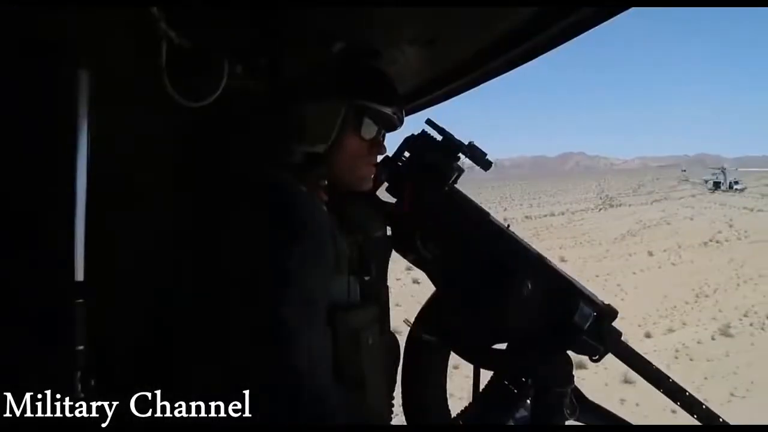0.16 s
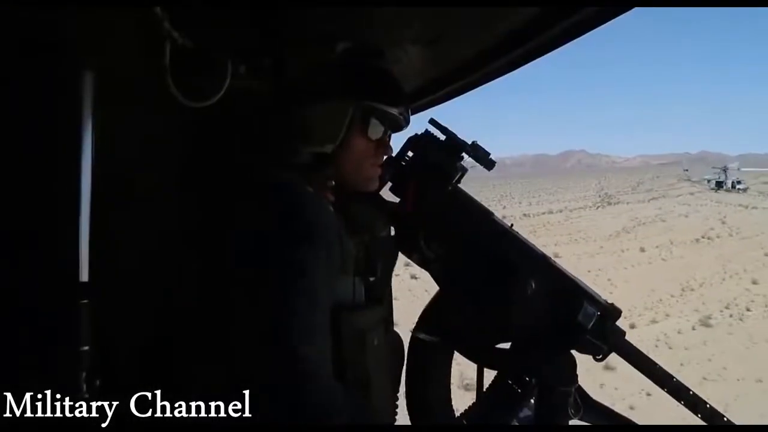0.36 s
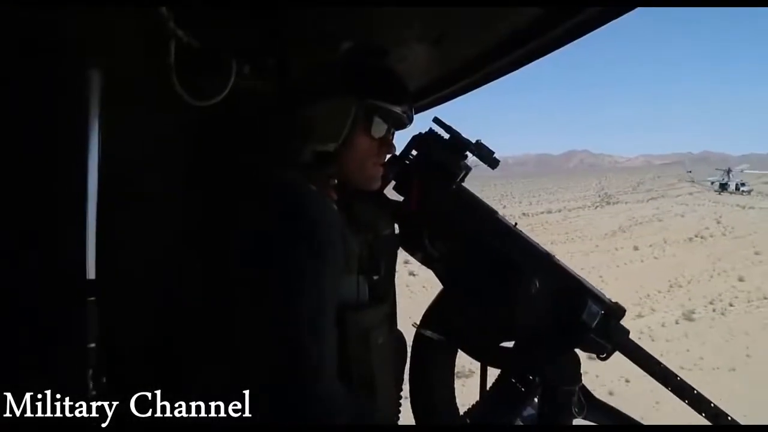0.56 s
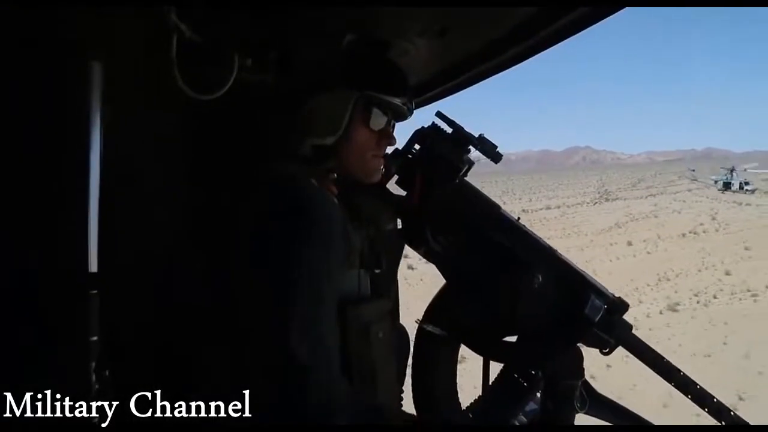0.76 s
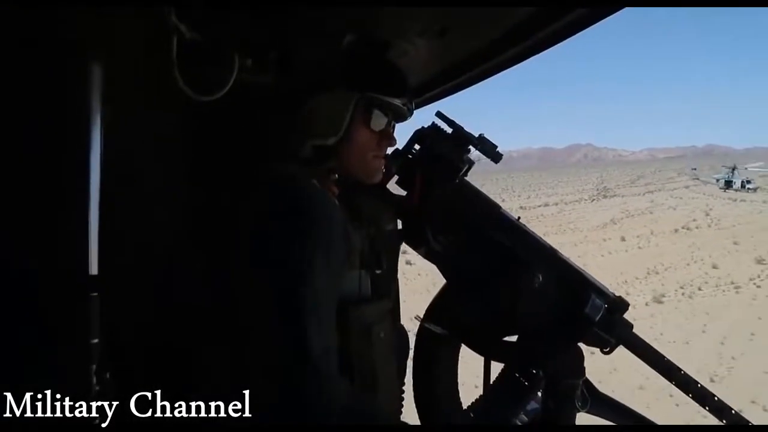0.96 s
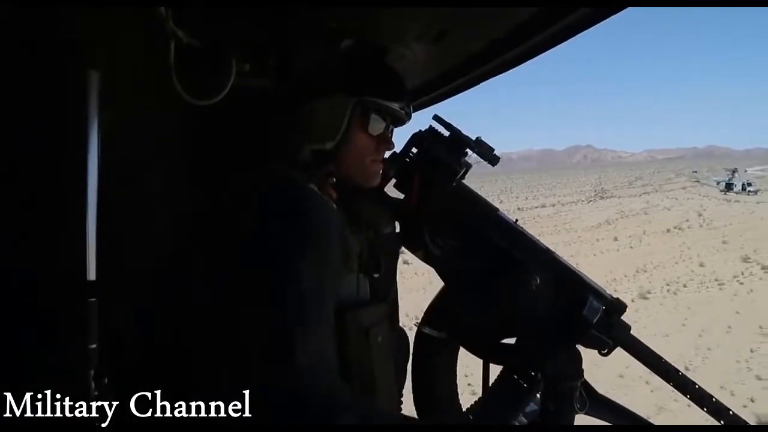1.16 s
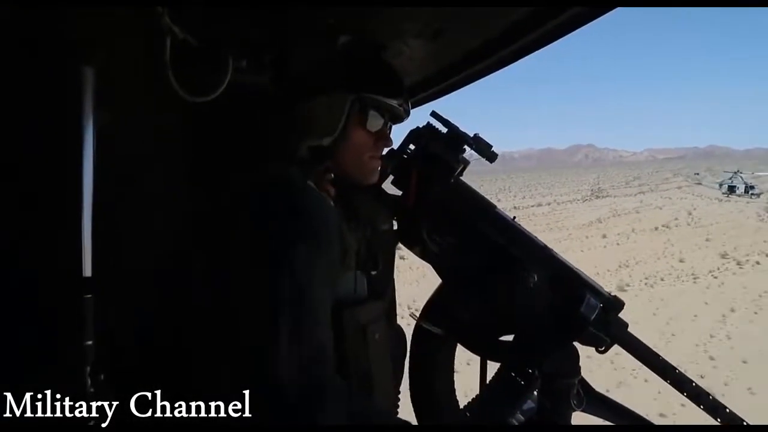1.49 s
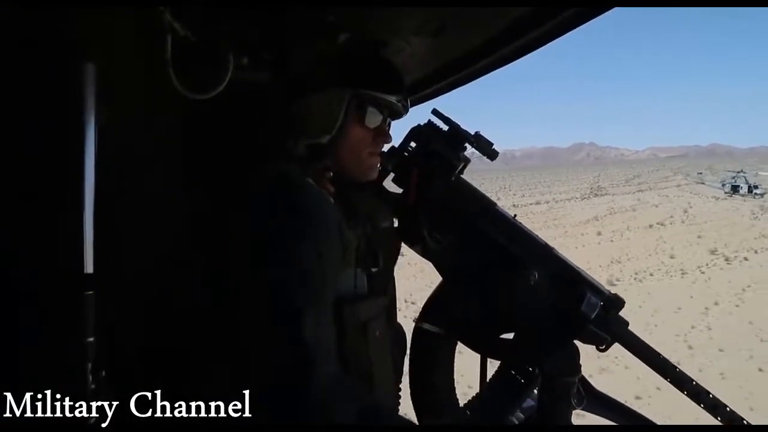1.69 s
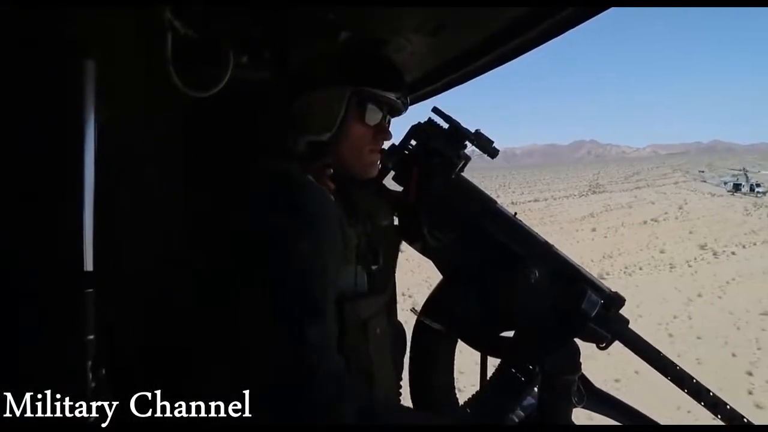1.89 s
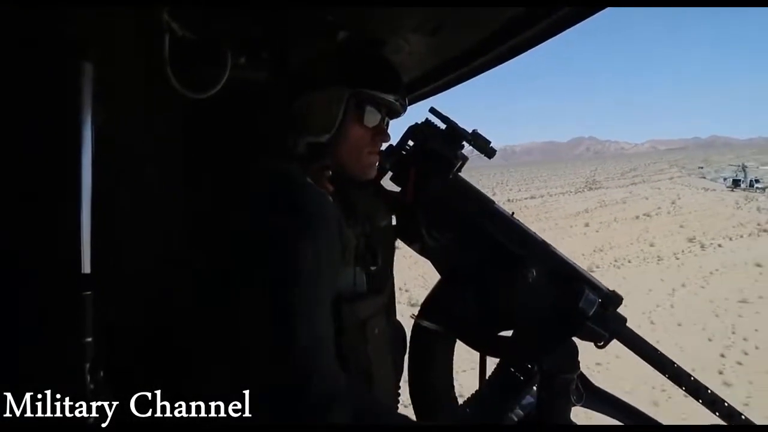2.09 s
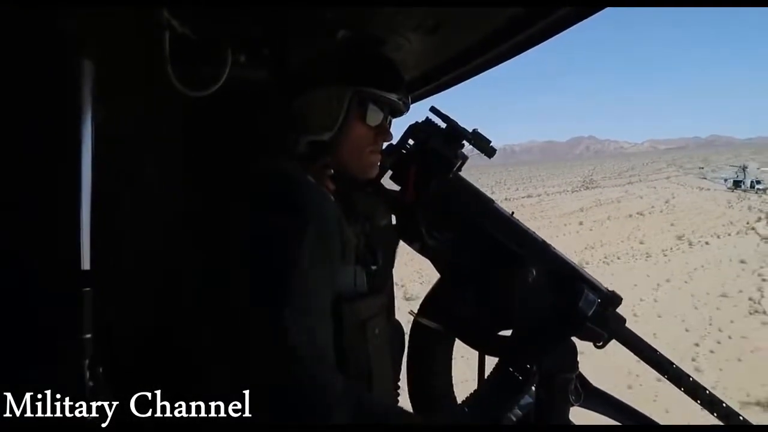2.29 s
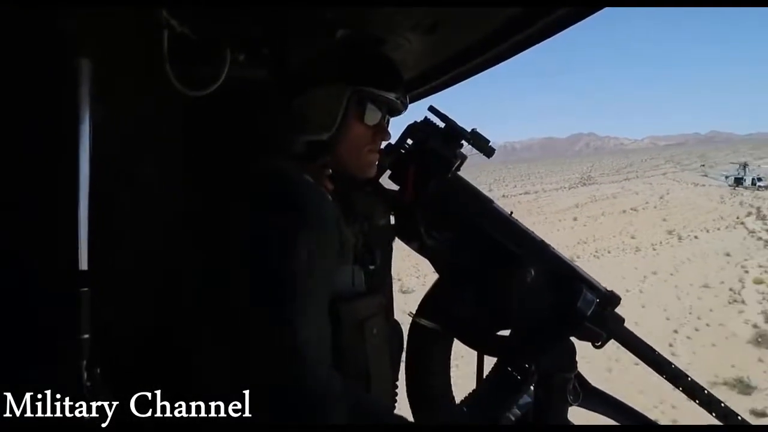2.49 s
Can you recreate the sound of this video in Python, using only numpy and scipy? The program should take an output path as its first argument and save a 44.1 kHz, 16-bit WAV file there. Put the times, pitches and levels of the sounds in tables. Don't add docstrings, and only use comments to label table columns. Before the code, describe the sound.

Steady whining drone of a flying helicopter from inside, rough rushing air crackling and overloading the mic

```python
import sys
import numpy as np
from scipy import signal
from scipy.fft import rfft, irfft, next_fast_len
from scipy.io import wavfile
from scipy.ndimage import uniform_filter1d

SR = 44100
rng = np.random.default_rng(int(sys.argv[2]) if len(sys.argv) > 2 else 0)


def boost(x):
    u = np.asarray(x, float) / 20
    return 10 ** u


def store_pcm(level_fs):
    pcm = np.round(np.clip(level_fs, -1, 1) * 32767).astype(np.int16)
    wavfile.write(sys.argv[1], SR, np.atleast_2d(pcm).T)


N = 116865
TOP_HZ = 15100


def unit(x):
    return x / np.sqrt(np.mean(x ** 2))


def curve_db(points, hz):
    f, db = np.array(points, float).T
    return np.interp(np.log(np.maximum(hz, 1)), np.log(f), db)


def shape(x, gain):
    size = next_fast_len(N + 4096)
    hz = np.arange(size // 2 + 1) * SR / size
    return irfft(rfft(x, size) * gain(hz), size)[..., :N]


def walk(rate_hz):
    hold = int(SR / rate_hz)
    steps = np.repeat(rng.standard_normal(N // hold + 1), hold)
    slewed = uniform_filter1d(uniform_filter1d(steps, hold), hold)
    return unit(slewed[:N])


# [f/Hz, density/dB per Hz]
ROAR_SPECTRUM = [(120, -2.5), (250, -3.5), (500, -6.5), (1000, -12.5), (2000, -15.5), (3500, -24),
                 (6000, -34), (14000, -49.5)]
ROAR_DB, ROAR_FLICKER_DB, ROAR_SWELL_DB = 5.5, 1.06, 0.44


def roar():
    out, swell = 0, walk(1.7)
    for hz in 110 * 2 ** np.arange(0, 7.5, .5):
        def band_gain(f):
            octaves = np.log2(np.maximum(f, 1) / hz)
            return boost(curve_db(ROAR_SPECTRUM, f)) * np.exp(-(octaves / 0.37) ** 2)
        band = shape(rng.standard_normal(N), band_gain)
        out = out + band * boost(ROAR_SWELL_DB * swell + ROAR_FLICKER_DB * walk(11))
    return boost(ROAR_DB) * unit(out)


def eddies():
    level_db, centre_hz, width_hz = 3.5, 83.3, 141
    hump = shape(rng.standard_normal(N), lambda f: np.exp(-.5 * ((f - centre_hz) * 2 / width_hz) ** 2))
    return boost(level_db) * unit(hump)


# [t/s, f/Hz, spread/cycles, signed strength/rail before GUST_DB]
GUST_TIMES = [(0.0105, 43, 0.25, 1.77), (0.1083, 43, 0.4, -1.7), (0.234, 43, 1.8, -0.99),
              (0.3352, 43, 0.6, -0.93), (0.4814, 28, 0.4, 0.9), (0.5118, 38, 0.4, -1.54),
              (0.6251, 43, 0.6, 1.15), (0.7084, 28, 0.9, -0.7), (0.7737, 38, 0.6, 0.89),
              (0.8451, 48, 1.8, -0.76), (0.9523, 43, 1.8, 0.76), (1.0401, 33, 0.4, 1.82),
              (1.1095, 43, 0.9, 1.13), (1.1973, 38, 0.6, -1.75), (1.3185, 28, 0.6, -0.98),
              (1.3903, 48, 1.8, 0.8), (1.549, 43, 1.8, -1.25), (1.5779, 33, 1.8, 0.75),
              (1.78, 48, 0.9, 1.16), (1.8752, 38, 1.8, 0.83), (1.8997, 48, 1.8, 0.54),
              (2.0094, 38, 0.9, -1.24), (2.1626, 55, 1.8, -0.73), (2.1776, 33, 1.3, 0.97),
              (2.2938, 43, 1.8, -1.63), (2.3137, 28, 1.3, -0.51), (2.3556, 48, 1.3, 0.72),
              (2.4539, 48, 1.3, 0.99), (2.5457, 33, 0.6, -1.27), (2.647, 48, 0.25, -1.54)]
GUST_DB = 10.5


def gust_rings(t):
    rings = 0
    for peak_s, hz, cycles, strength in GUST_TIMES:
        phase = (t - peak_s) * hz
        rings = rings + strength * np.cos(2 * np.pi * phase) * np.exp(-.5 * (phase / cycles) ** 2)
    return boost(GUST_DB) * rings


# [t/s, length/ms; sign = which rail]
LONG_SWINGS = [(0.0102, 4.8), (0.1078, -6.2), (0.1858, -6.1), (0.2335, -6.3), (0.2665, 7.2), (0.5263, 8.4),
               (0.6834, 9.2), (0.7682, 4.8), (0.8663, -6.3), (0.9295, 7.6), (1.038, 7.5), (1.0545, -6.8),
               (1.0988, -8.6), (1.1994, -5.6), (1.2093, 9.1), (1.4903, 5.1), (1.4997, -6.0), (1.5142, 4.8),
               (1.5277, -6.9), (1.5371, 5.4), (1.5495, -5.5), (1.5845, 6.0), (1.8645, -6.9), (1.9956, 7.1),
               (2.2214, -7.0), (2.2572, 7.0), (2.3043, 7.4), (2.3159, -10.8), (2.3293, 9.7), (2.4434, -5.3)]
SHORT_SWINGS = [(0.1201, 4.1), (0.2212, 2.8), (0.26, -3.2), (0.4891, -3.0), (0.5723, 4.4), (0.6246, 4.0),
                (0.7105, -4.1), (0.7865, -3.8), (0.9176, -3.3), (1.1939, -3.0), (1.5722, -2.9),
                (1.5984, -3.4), (1.6201, -4.3), (1.8296, -4.2), (1.8993, 4.1), (1.9794, -4.8),
                (1.9876, -3.5), (2.0605, -3.3), (2.108, -3.4), (2.1611, -4.6), (2.2829, 3.0),
                (2.2941, -3.7), (2.3418, -4.1), (2.3548, 4.4), (2.3733, 2.9), (2.423, -4.3), (2.4834, -2.9),
                (2.5256, 3.3), (2.5418, -4.5), (2.6173, 3.1)]
LONG_SWING_DB, SHORT_SWING_DB = 19, 14.5
SWING_WIDEN, SWING_EDGE = .98, 3.5


def swing_crests(t):
    crests = 0
    for swings, db in ((LONG_SWINGS, LONG_SWING_DB), (SHORT_SWINGS, SHORT_SWING_DB)):
        for centre, ms in swings:
            offset = np.abs((t - centre) * 2000 / (ms * SWING_WIDEN))
            crests = crests + boost(db) * np.sign(ms) * np.exp(-offset ** SWING_EDGE)
    return crests


# [t/s, low whine f/Hz, middle whine f/Hz, high whine f/Hz]
GEAR_SPEED = [(0, 682, 1276, 3690), (.5, 680.2, 1275.3, 3682), (1.3, 676.8, 1270.3, 3669),
              (1.9, 677.5, 1269.3, 3665), (2.65, 676.6, 1268, 3666)]
# [level/dB re rail, level flutter/dB, pitch flutter/share, response/dB per dB load]
WHINE_SETTINGS = [
    (1, 1.7, 0.00086, -0.24),
    (1, 1.75, 0.00052, 0.73),
    (-6.5, 2, 0.000915, -0.42),
]
# [t/s, load/dB]
GEARBOX_LOAD = [(0, 4.5), (.45, 0.5), (.8, 2), (1.2, -0.5), (1.6, -1.5), (2.1, -3.5), (2.65, -2.5)]


def whines(t):
    gears, out = np.array(GEAR_SPEED, float), 0
    load_db = np.interp(t, *np.array(GEARBOX_LOAD).T)
    for k, (db, flutter_db, share, response) in enumerate(WHINE_SETTINGS):
        hz = np.interp(t, gears[:, 0], gears[:, k + 1]) * (1 + share * walk(30.07))
        flutter = 0.78 * walk(20) + 0.9 * walk(70)
        level = boost(db + response * load_db + flutter_db * flutter)
        out = out + level * np.sqrt(2) * np.sin(2 * np.pi * np.cumsum(hz) / SR)
    return out


def scene():
    t = np.arange(N) / SR
    buffet = gust_rings(t) + swing_crests(t) + eddies()
    return np.tile(buffet + whines(t) + roar(), (2, 1))


def preamp(x):
    rail_db, knee, hiss_db, hiss_hz = -19.5, 4.3, -46.5, 4200
    hiss = unit(shape(rng.standard_normal(N), lambda f: 1 / (1 + 1j * f / hiss_hz)))
    return boost(rail_db) * x / (1 + np.abs(x) ** knee) ** (1 / knee) + boost(hiss_db) * hiss


def low_cut(f):
    cut_hz, q, coupling_hz = 110, .56, 3
    s = 1j * f
    return s ** 2 / (s ** 2 + s * cut_hz / q + cut_hz ** 2) * s / (s + coupling_hz)


# [f/Hz, level/dB]
MIC_COLOUR = [(300, -1.5), (1500, -2), (3000, -1.5), (4500, -5), (6500, -9.5), (9000, -8), (14000, 0.5),
              (15000, -2)]


def colour(x):
    return shape(x, lambda f: low_cut(f) * boost(curve_db(MIC_COLOUR, f)) * (f < TOP_HZ))


PATCH_DB, SIDE_DB, SIDE_HZ, SIDE_SWELL_DB, SIDE_PATCH_DB = 1, -7.5, 5260, 7, 7


def treble(mid):
    change, side, swell = 0, 0, walk(29.87)
    for hz in np.arange(4200, 16000, 600):
        def strip(f):
            return np.cos(np.pi / 2 * np.clip((f - hz) / 600, -1, 1)) ** 2
        band = shape(mid, strip)
        change = change + band * (boost(PATCH_DB * walk(44.95)) - 1)
        scrambled = shape(band * walk(900), strip)
        patch_db = SIDE_SWELL_DB * swell + SIDE_PATCH_DB * walk(39.7)
        side = side + scrambled * boost(np.minimum(patch_db, 4))
    side = shape(side, lambda f: (f < TOP_HZ) / (1 + (SIDE_HZ / np.maximum(f, 1)) ** 6))
    return mid + change, boost(SIDE_DB) * side


def low_pass(x):
    return signal.sosfilt(signal.butter(12, 15650, fs=SR, output="sos"), x)


def record(dry):
    mid, side = treble(colour(preamp(dry[0])))
    return low_pass(np.array([mid + side, mid - side]))


dry = scene()
out = record(dry)
store_pcm(out)
```